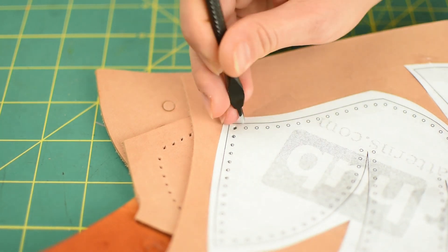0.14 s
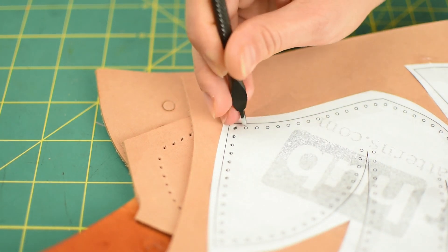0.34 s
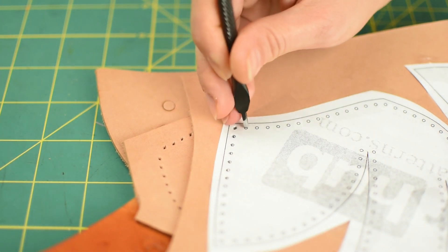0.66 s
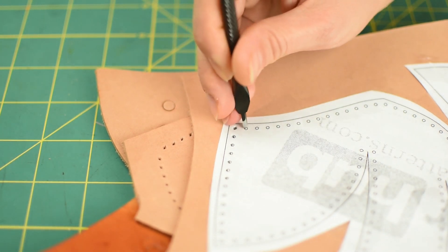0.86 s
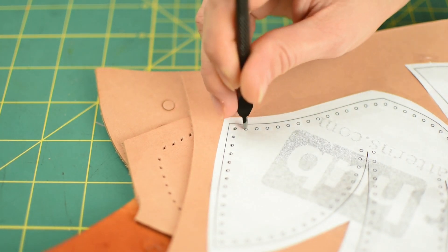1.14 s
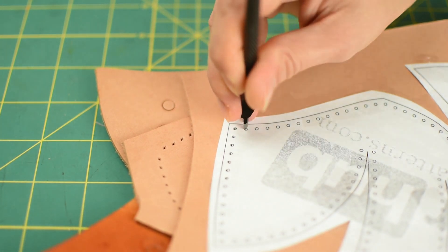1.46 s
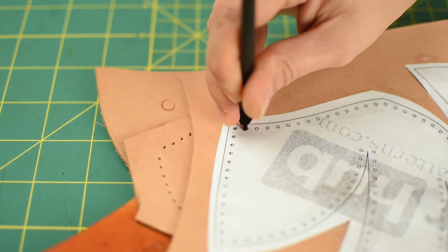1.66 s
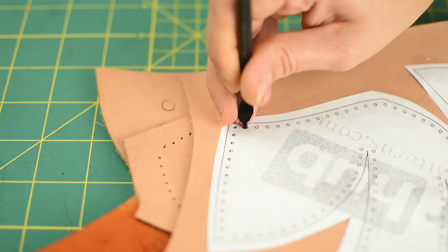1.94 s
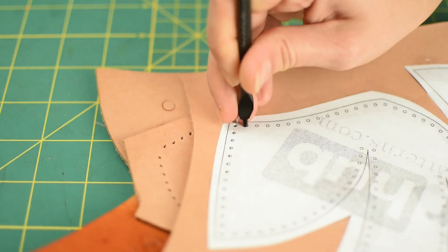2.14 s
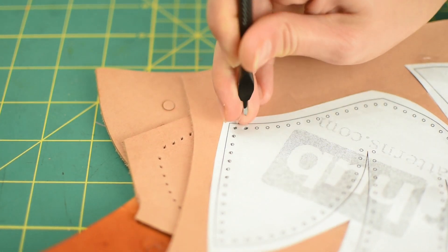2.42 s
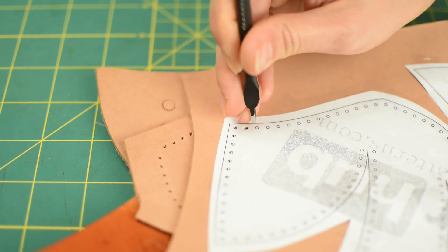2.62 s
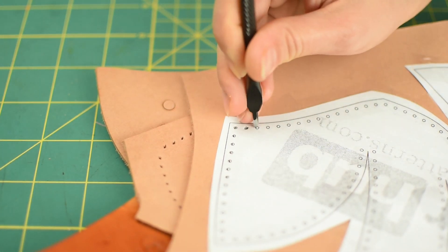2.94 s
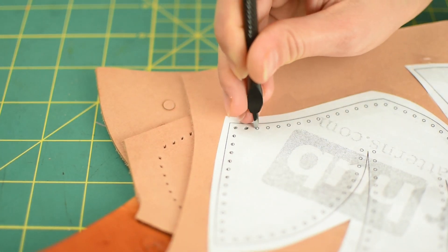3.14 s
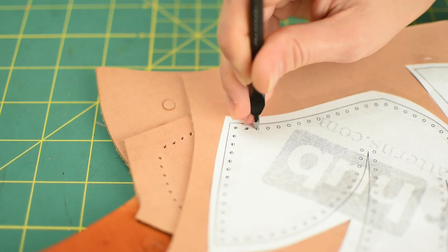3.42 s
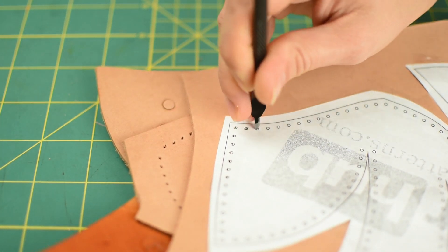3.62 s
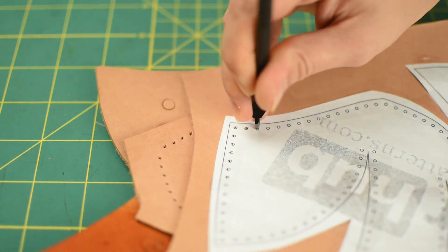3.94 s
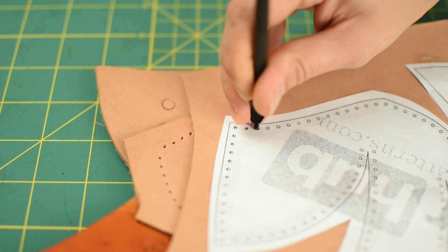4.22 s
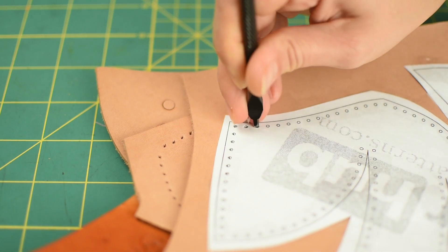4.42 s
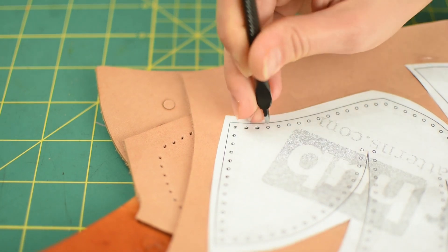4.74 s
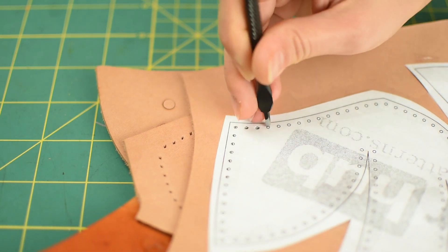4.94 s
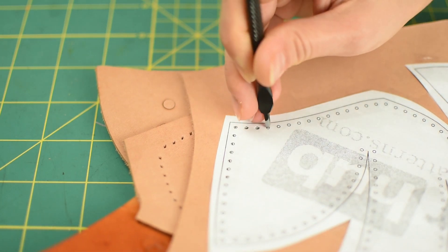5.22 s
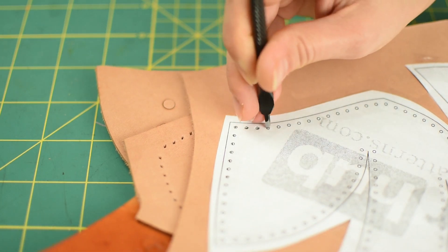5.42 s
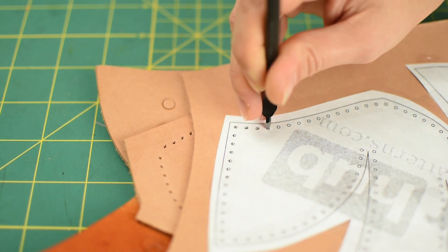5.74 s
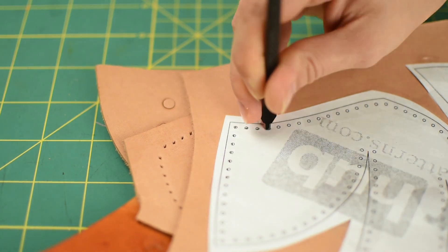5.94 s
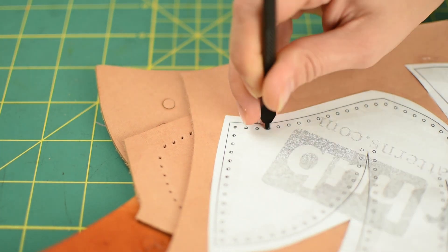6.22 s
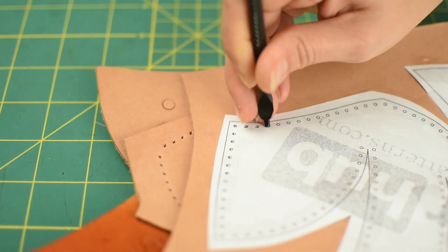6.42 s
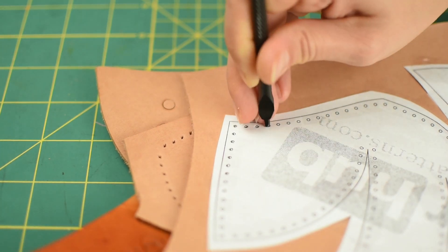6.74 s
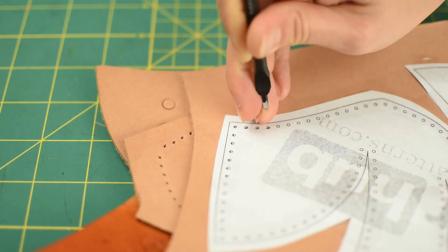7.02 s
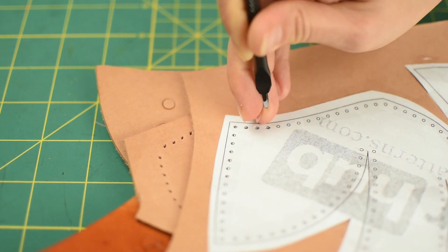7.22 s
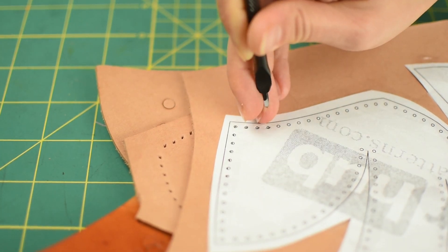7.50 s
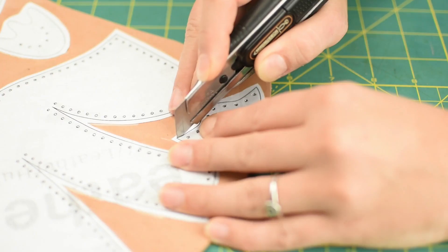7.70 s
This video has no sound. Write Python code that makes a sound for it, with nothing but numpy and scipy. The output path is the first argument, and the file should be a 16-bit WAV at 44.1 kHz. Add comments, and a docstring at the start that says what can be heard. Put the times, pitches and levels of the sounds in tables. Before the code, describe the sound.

A mallet drives a steel punch through leather in three loud blows on a workbench, with faint ticks and small hollow pops between.

```python
"""Punching leather on a workbench

A wooden mallet drives a steel punch through leather three times, exciting the modes of punch and bench
and overloading a close microphone. Between blows the punch slides and ticks on the paper pattern and
pops out of its holes, while a fan hums and a wall clock ticks in the small room. Near the end, after
a short silence, a knife starts to scrape."""
import sys
import numpy as np
from scipy import signal
from scipy.fft import rfft, irfft, next_fast_len
from scipy.io import wavfile
from scipy.ndimage import uniform_filter1d, map_coordinates

SR = 44100
rng = np.random.default_rng(int(sys.argv[2]) if len(sys.argv) > 2 else 0)


def store_wav(level_fs):
    """Save 16-bit WAV to argv[1]."""
    pcm = np.round(np.clip(np.atleast_2d(level_fs), -1, 1) * 32767)
    wavfile.write(sys.argv[1], SR, pcm.T.astype(np.int16))


N = 347057

# Mallet blows. Each row: time in seconds, level in dB, bench gain in dB, crash tilt in dB per octave,
# rattle gain in dB.
BLOWS = [(1.641, 0.5, -4, -0.5, 6), (4.01, -2, -3, 0, 1.5), (5.962, 0.5, -2.5, 0, 5)]
# Reflections from bench, hands and wall. Each row: delay in seconds, gain in dB.
ECHOES = [(.003, -1), (.0056, -2), (.0085, -5.5)]
def blows():
    """Superposition: one impact excites punch, tools and bench; the strike returns as early echoes."""
    out, t = np.zeros((2, N)), np.arange(SR) / SR
    for s, db, bench_db, tilt_db, rattle_db in BLOWS:
        strike = punch_strike(t)
        blow = strike + crash(t, tilt_db) + rattle(t, rattle_db) + bench_top(t, bench_db)
        add(out, amp(db) * blow, s + 0.00027)
        for delay, echo_db in ECHOES:
            add(out, amp(db + echo_db) * strike[None], s + delay)
    return out


# Modes of the struck punch. Each row: frequency in Hz, level in dB, T60 (time to fall 60 dB) in seconds.
PUNCH_MODES = [(1302, -2.5, 0.037), (1750, -5, 0.014), (2124, -8.5, 0.044), (2893, -3, 0.045),
               (3250, -3.5, 0.023)]
def punch_strike(t):
    """Impulsive excitation: a pressure front pushes and rebounds, then the steel rings."""
    u = t / .00009
    front = 3.5 * u ** 2 * (1 - .3 * u) * np.exp(-u)
    return front + amp(-5) * ring(PUNCH_MODES, t, scatter_db=1.4, attack_s=0.0025)


# Spectrum of all that shakes in a blow. Each row: frequency in Hz, relative level in dB.
CRASH_SPECTRUM = [(90, -31.5), (140, -12), (320, -10), (545, -10.5), (800, -6), (950, -9.5), (1300, -7.5),
                  (2000, -9.5), (3200, -15), (4500, -22), (7000, -29.5), (9300, -34), (12000, -43),
                  (15900, -54.5)]
# Its decay. Each row: frequency in Hz, T60 in seconds.
CRASH_T60 = [(150, 0.84), (500, .33), (1500, 0.32), (4000, 0.33), (10000, 0.21), (16000, 0.16)]
def crash(t, tilt_db):
    """Modal overlap: the many resonances of tools and walls merge into decaying noise."""
    colour_db = lambda hz: along(CRASH_SPECTRUM, hz) + tilt_db * np.log2(hz / 1500)
    noise = decaying_noise(CRASH_T60, colour_db, seconds=1)[:, :SR]
    near_clatter = 1 + amp(-3.5 - 60 * t / 0.017)  # dies first
    grain = amp(2.5 * wobble(160, count=SR) * rise(t, 0.036))
    return amp(20.5) * noise * rise(t, 0.0003) ** 2 * near_clatter * grain


# Resonances of loose tools. Each row: frequency in Hz, bandwidth in Hz, gain in dB.
TOOL_BANDS = [(4840, 1100, 3.5), (9200, 2200, 1.5), (13500, 6100, -7)]
def rattle(t, db):
    """Secondary impacts: jolted tools land in clumps, heard as uneven bright noise."""
    landings = rng.standard_normal((2, SR)) * amp(1.4 * wobble(110, count=SR) - 60 * t / .22)
    bright = filtered(landings * rise(t, 0.013), lambda hz: resonances(TOOL_BANDS)(hz) ** 2)
    return amp(db - 25.5) * stereo(bright, NEAR_COHERENCE)


# Modes of the bench top, and its lowest pair. Each row: frequency in Hz, level in dB, T60 in seconds.
BENCH_MODES = [(136, -7, 0.083), (162, -3.5, 0.092), (288, -4.5, 0.067), (169, -17, 0.36), (211.2, -16, .5),
               (255.7, -8.5, 0.37), (278, -3, 0.2), (297.7, -11.5, 0.43), (335.5, -5.5, 0.29),
               (436, -18, 0.13), (433, -16, 0.24), (503, -17.5, .35), (633, -15, 0.42), (801, -14, 0.33),
               (956, -18.5, 0.42), (1099, -17, .3)]
BOOM_MODES = [(92.5, -9, .24), (99.5, -9, .24)]
def bench_top(t, db):
    """Plate vibration: the wood rings while its two lowest modes swell in and beat."""
    first_swings = 1 + amp(-3.5 - 60 * t / 0.029)  # soon damped by the hand
    wood = amp(db - 5) * ring(BENCH_MODES, t, scatter_db=0.89, attack_s=0.0023) * first_swings
    return wood + amp(db - 1) * ring(BOOM_MODES, t, scatter_db=0.79, attack_s=0.02)


# Modes of the bench on its legs. Each row: frequency in Hz, level in dB, T60 in seconds.
LEG_MODES = [(30, -52, 1), (34.2, -51.5, 1)]
def bench_sway():
    """Beating: two slow modes of nearly equal frequency interfere after each blow."""
    out, t = np.zeros(N), np.arange(SR) / SR
    for s, db, *_ in BLOWS:
        add(out, amp(db) * ring(LEG_MODES, t, scatter_db=0.94, attack_s=0.0065), s)
    return out


# The punch taps, bounces or pops free. Each row: time in seconds, level in dB, pop pitch in Hz,
# crack gain in dB, thud gain in dB, damping factor (1 is free).
KNOCKS = [(0.0651, -45, 1190, -6.5, -22, 1.5), (1.0004, -41.5, 1180, -9, -20, 0.59),
          (1.1178, -38.5, 1280, 0, -25, 0.48), (1.1652, -48, 1210, -6, -12.5, 1),
          (1.4004, -47.5, 1200, 2, -4.5, 1), (2.408, -14, 1530, -5, -10.5, 0.57),
          (3.5503, -38, 1500, 1, -16.5, 1), (3.5893, -45, 1150, -12, -11, 1.5),
          (3.6761, -41, 1502, 2.5, -16, 1), (3.9578, -46.5, 1944, -4.5, 6, 1.5),
          (4.0983, -15.5, 1870, -14.5, -3.5, 0.37), (4.124, -20, 2070, -8, -1, 1),
          (4.2019, -28, 1300, -10, 6, 0.3), (4.2566, -42.5, 1160, -12, -8, 1.3),
          (4.379, -40, 1140, -15, -3.5, 0.55), (4.5017, -18, 1142, 1.5, -6.5, 0.43),
          (6.942, -17, 1565, -9.5, -7, .7), (7.5865, -24, 1123, -6.5, -6.5, 0.88)]
# Modes of the hollow punch. Each row: frequency in Hz, level in dB, T60 in seconds.
TUBE_MODES = [(830, -6, .03), (1125, 0, .025), (1175, -3, .035), (1280, -4, .025), (1510, -2, .025),
              (1640, 0, .02), (1870, -3, .025), (2100, -4, .025), (2870, -4, .02), (3700, -3, .02)]
def punch_knocks():
    """Resonance: a hollow pop excites the tube modes near its pitch, with a crack and a bench thud."""
    out, t = np.zeros(N), np.arange(SR // 4) / SR
    for s, db, pop_hz, crack_db, thud_db, damping in KNOCKS:
        pop = (t / 0.0008) ** 1.2 * np.exp(-t / 0.001) * np.sin(2 * np.pi * pop_hz * t)
        snap = (amp(-60 * t / 0.024) + amp(-21 - 60 * t / 0.043)) * rise(t, 0.00017)
        cutoff_hz = 30000 * amp(.45 * db)  # softer knocks are duller
        crack = filtered(snap * rng.standard_normal(len(t)),
                         lambda hz: band(2500, 5000)(hz) ** 2 / (1 + 1j * hz / cutoff_hz))
        thud = ring(BOOM_MODES + BENCH_MODES, t, scatter_db=2, attack_s=0.013)
        thud *= amp(thud_db - 60 * t / 0.14)  # damped by the resting hand
        slip = filtered(rng.standard_normal(400), lambda hz: band(pop_hz, 2500)(hz) ** 3)
        slip *= amp(db - 19.5 + 60 * (t[:400] - t[400]) / 0.041)
        add(out, slip, s - t[400])  # the leather slips just before it lets go
        modes = [(hz, level - 7 * np.log2(hz / pop_hz) ** 2, t60 / damping)
                 for hz, level, t60 in TUBE_MODES]
        tube = ring(modes, t, scatter_db=2, attack_s=.0015)
        add(out, amp(db - 7) * (amp(7.5) * pop + amp(-7) * tube + amp(crack_db) * crack + thud), s)
    return out


# The punch shifts in the fingers. Each row: time in seconds, level in dB, tilt in dB per octave.
TICKS = [(0.1107, -47, 1), (0.207, -43, -1), (0.2536, -46.5, -3), (0.305, -43.5, -7), (0.614, -40, -2),
         (2.3354, -43.5, -9), (2.8421, -40.5, -6), (6.303, -44.5, -6)]
# Modes of the free shaft. Each row: frequency in Hz, level in dB, T60 in seconds.
SHAFT_MODES = [(2320, 0.5, 0.045), (3840, 7.5, 0.036), (4530, 5, 0.02), (5460, 1, 0.081), (6040, 0, 0.043)]
def shaft_ticks(grip_damping=3):
    """Damped vibration: the fingers absorb energy, so the steel shaft rings only briefly."""
    out, t = np.zeros(N), np.arange(SR // 10) / SR
    middle_lift_db = lambda hz: 2 * np.exp(-(np.log2(hz / 4000) / .3) ** 2)
    for s, db, tilt_db in TICKS:
        modes = [(hz, level + tilt_db * np.log2(hz / 3800) + middle_lift_db(hz), t60 / grip_damping)
                 for hz, level, t60 in SHAFT_MODES]
        burst = amp(8.5 - 60 * t / 0.012) * rng.standard_normal(len(t))
        snap = filtered(burst, lambda hz: band(4300, 3200)(hz) ** 3)
        add(out, amp(db - 11.5) * (ring(modes, t, scatter_db=2.8, attack_s=0.00074) + snap), s)
    return out


# Touches of punch tip, paper and mallet face. Each row: time in seconds, level in dB, centre in Hz,
# upper band gain in dB, hiss T60 in seconds.
CLICKS = [(0.0423, -52, 2340, -10, .045), (0.0578, -43, 2750, -20, 0.1), (0.398, -42, 2270, -8.5, 0.18),
          (0.7248, -47, 3300, -16, .12), (1.0105, -48, 2010, -15, .045), (1.0494, -52, 2530, -9, .045),
          (1.3433, -41.5, 2364, -8, .06), (1.8517, -46, 2290, 0, .03), (1.9714, -52, 2740, -26, .045),
          (2.0223, -58, 2200, -18, .045), (2.0544, -56, 2120, -16, 0.049), (2.1051, -52, 3890, -6, .03),
          (2.1266, -34.5, 3490, 21.5, 0.18), (2.1394, -36.5, 2270, -7, 0.111),
          (2.1924, -47, 1880, -18, .04), (2.6135, -47, 2290, -8, .06), (3.8127, -43, 2403, -8, 0.022),
          (4.9432, -35.5, 2800, 0, 0.085), (5.6835, -41.5, 2412, -23, 0.055), (5.9, -32.5, 2365, -14, .045),
          (5.9069, -41.5, 2990, -15.5, .045), (5.9114, -39.5, 2310, -15.5, .045),
          (5.9180, -29, 2490, -8.5, .03), (5.9229, -25, 4105, -10, .04), (5.9344, -39, 3000, 16.5, 0.028),
          (6.2140, -51, 4000, 16, .03), (6.2721, -37.5, 2030, -5.5, .063),
          (6.3435, -36, 2570, -12.5, 0.058), (6.3594, -40, 2518, -21, 0.13),
          (6.4208, -43.5, 2480, -12, .045), (6.536, -43.5, 2700, -15, .05)]
def contact_clicks():
    """Brief contact has a broad spectrum: a tick in two wide bands, with a papery after-hiss."""
    out, t = np.zeros(N), np.arange(SR // 6) / SR
    paper_lowpass = lambda f: 1 / (1 + 1j * f / 9000) ** 2
    for s, db, hz, upper_db, t60 in CLICKS:
        burst = rng.standard_normal(len(t)) * (amp(-60 * t / 0.013) + amp(-7.5 - 60 * t / t60))
        lower, upper = band(hz, 0.99 * hz), band(5300, 9000)
        tick = filtered(burst, lambda f: (lower(f) ** 3 - amp(upper_db) * upper(f) ** 3) * paper_lowpass(f))
        add(out, amp(db) * tick / np.abs(tick).max(), s)
    return out


# Loose things rock after a blow, and paper shifts. Each row: start and length in seconds, level in dB,
# drift in dB per second.
ROCKING = [(1.85, 0.49, -47.5, -20.5), (4.22, .15, -57, -150), (6.15, 0.66, -47, -70)]
PAPER_SHIFTS = [(1.9, 0.31, -56.5, -5), (4.43, 0.027, -69, 0), (5.41, 0.053, -60, 0), (6.23, .4, -65, -4.5),
                (7.05, 0.046, -64.5, -64), (7.31, 0.071, -58, -65)]
# Resonances of the rocking things. Each row: frequency in Hz, bandwidth in Hz, gain in dB.
ROCKING_BANDS = [(159.4, 62, -4), (213.4, 74, -1), (276, 43, -1.5), (481, 130, -8.5)]
# Rustle of the paper. Each row: frequency in Hz, relative level in dB.
PAPER_SPECTRUM = [(290, -48), (500, -6), (796, -4), (1030, -12), (1140, -9), (2740, -16.5), (12000, -46.5),
                  (15600, -64), (22000, -120)]
def tools_and_paper(contacts_per_s=40, depth_db=5):
    """Amplitude modulation: repeated contacts pulse the hum of rocking tools and the rustle of paper."""
    hum = friction(lambda hz: resonances(ROCKING_BANDS)(hz) ** 2, rate=25, rough_db=1.5)
    contacts = np.cumsum(contacts_per_s * (1 + .25 * wobble(12))) / SR
    bumps = amp(depth_db * np.cos(2 * np.pi * contacts))
    rustle = friction(lambda hz: amp(along(PAPER_SPECTRUM, hz)), rate=87, rough_db=3.5)
    return (strokes(ROCKING, attack_s=.01, release_s=0.23) * unit(bumps * hum)
            + strokes(PAPER_SHIFTS, attack_s=0.047, release_s=.1) * unit(bumps * rustle))


# The punch slides over the work. Each row: start and length in seconds, level in dB.
SLIDES = [(0.973, 0.12, -62), (1.64, .025, -57), (3.454, 0.16, -67), (3.934, .04, -57.5),
          (4.341, 0.043, -61)]
# Resonances of the sliding tube. Each row: frequency in Hz, bandwidth in Hz, gain in dB.
RASP_BANDS = [(1110, 78, -1.5), (1270, 140, -4.5), (1650, 200, -11.5), (2940, 400, -18)]
def punch_slides(swell_db_per_s=44):
    """Sliding friction drives the tube's resonances, louder as each stroke goes on."""
    gain = strokes([(*row, swell_db_per_s) for row in SLIDES], attack_s=0.16, release_s=.03)
    return gain * scrape(RASP_BANDS, rate=100, rough_db=2.5)


# One twist of the punch: start and length in seconds, level in dB, drift in dB per second.
TWIST = (6.38, .29, -61, -3)
# Resonances of its creak. Each row: frequency in Hz, bandwidth in Hz, gain in dB.
CREAK_BANDS = [(1590, 140, -4), (2186, 14, -1), (2475, 60, -3.5)]
def punch_twist():
    """Uneven friction: the punch creaks as it turns in the leather."""
    return strokes([TWIST], attack_s=0.025, release_s=0.051) * scrape(CREAK_BANDS, rate=18, rough_db=6)


# Knife strokes. Each row: start and length in seconds, level in dB.
CUTS = [(7.667, 0.066, -57.5), (7.774, 0.015, -58.5), (7.796, 0.065, -69.5)]
# Resonances of the blade. Each row: frequency in Hz, bandwidth in Hz, gain in dB.
BLADE_BANDS = [(1710, 60, 2), (2174, 234, -2), (2810, 30, -10), (3545, 32, -12)]
def knife():
    """Forced vibration: scraping drives the blade and a low resonance of the mat under it."""
    cuts = [(*row, 0) for row in CUTS]
    blade = scrape(BLADE_BANDS, rate=200, rough_db=5.5)
    mat = amp(-5.5) * friction(band(400, 180), rate=60, rough_db=1.1)
    return (strokes(cuts, attack_s=0.018, release_s=0.028) * blade
            + strokes(cuts, attack_s=.05, release_s=0.14) * mat)


# Resonances of the clock case. Each row: frequency in Hz, bandwidth in Hz, gain in dB.
CASE_BANDS = [(860.3, 27, -7), (1460, 32, 3), (2000, 29, -10), (2700, 65, -1), (3000, 59, -7.5),
              (4630, 63, -5), (5500, 290, -5)]
def clock():
    """Case resonance: once a second a stepping motor whirrs briefly, heard mostly off the walls."""
    second, t = np.divmod(np.arange(N) / SR - .41, 1)
    step = rise(t, 0.0188) ** 2 * amp(-60 * t / .2)
    noise = rng.standard_normal((2, N))
    case = lambda hz: resonances(CASE_BANDS[:-1])(hz) + amp(-12.5) * band(1800, 4000)(hz)
    body = filtered(noise, lambda hz: case(hz) / (1 + (hz / 7000) ** 4))
    top = filtered(noise, lambda hz: resonances(CASE_BANDS[-1:])(hz) ** 2)
    top *= amp(1.5 - 7 * (second % 2 == 0))  # every other tick is duller
    return amp(-44) * step * stereo(unit(body + top), FAR_COHERENCE)


# Decay of the room. Each row: frequency in Hz, T60 in seconds.
ROOM_T60 = [(150, 0.89), (1000, 0.15), (4000, 0.2), (12000, 0.28)]
def room(x):
    """Reverberation by convolution: the response changes every half second, as hands and tools move."""
    out, hop = np.zeros((2, N)), SR // 2
    for start in range(0, N, hop):
        tail = decaying_noise(ROOM_T60, np.zeros_like, seconds=.45)
        add(out, signal.fftconvolve(x[None, start:start + hop], tail, axes=1), start / SR + 0.005)
    return out


# Faint coloured hiss. Each row: start and length in seconds, level in dB, centre in Hz.
WHISTLES = [(.36, .25, -75, 2780), (2.7, .3, -77, 2780), (7.04, .3, -78, 4230)]
def whistles():
    """Narrow-band noise has a faint pitch; it comes and goes barely over the room tone."""
    responses = lambda f: np.array([band(hz, 220)(f) ** 2 for *_, hz in WHISTLES])
    noises = friction(responses, rate=40, rough_db=4)
    return sum(strokes([(s, length, db, 0)], attack_s=0.13, release_s=0.17) * noise
               for (s, length, db, _), noise in zip(WHISTLES, noises))


# Colour of the room tone. Each row: frequency in Hz, relative level in dB.
AIR_SPECTRUM = [(20, -13), (45, -12), (75, -14.5), (105, -8.5), (145, -4.5), (215, -7), (269, -4.5),
                (336, -7), (430, -7.5), (676, -4.5), (900, -7.5), (1250, -11.5), (2300, -15.5),
                (4000, -20.5), (7000, -28.5), (10000, -32.5), (13000, -37.5), (16000, -40.5)]
# Its course. Each row: time in seconds, level in dB.
AIR_LEVELS = [(0, -60.5), (1.5, -62), (2.6, -59), (3.3, -61), (4.7, -61.5), (5.3, -62), (5.5, -58),
              (5.9, -61), (6.8, -61), (7.6, -59), (7.87, -61)]
def room_tone():
    """Ambient noise: a broad spectrum whose level varies in soft patches of time and frequency."""
    spectra = signal.stft(rng.standard_normal((2, N)), nperseg=512)[2]
    patches = uniform_filter1d(rng.standard_normal(spectra.shape[1:]), size=6, axis=0)
    patches = uniform_filter1d(patches, size=14, axis=1)
    noise = signal.istft(spectra * amp(1.1 * unit(patches)), nperseg=512)[1][:, :N]
    tone = unit(stereo(filtered(noise, lambda hz: amp(along(AIR_SPECTRUM, hz))), FAR_COHERENCE))
    return amp(np.interp(np.arange(N) / SR, *np.transpose(AIR_LEVELS))) * tone


# Blade tones of the fan. Each row: frequency in Hz, level in dB.
FAN_TONES = [(140.0, -73.5), (279.9, -76), (414.5, -78.5), (554.5, -84), (672.9, -73.5)]
def fan():
    """Rotating blades radiate tones, unsteady in amplitude and phase."""
    t = np.arange(N) / SR
    return sum(amp(db + 2 + 3 * wobble(12)) * np.sin(2 * np.pi * hz * t + 2.2 * wobble(14))
               for hz, db in FAN_TONES)


def microphone_hiss():
    """Self-noise: the microphone ports add a steady high hiss."""
    return amp(-85) * filtered(rng.standard_normal((2, N)), lambda hz: hz / (hz + 6000))


# Likeness of left and right, for near and for far sound. Each row: frequency in Hz, correlation.
NEAR_COHERENCE = [(100, .998), (1000, .992), (2500, .95), (5000, .87), (10000, .65), (16000, .4)]
FAR_COHERENCE = [(60, 0.56), (180, 0.61), (550, 0.83), (1650, 0.53), (4970, 0.35), (15000, -0.82)]
def stereo(pair, coherence):
    """Mid-side mixing gives two independent signals a set correlation."""
    angle = lambda hz: np.arccos(np.clip(along(coherence, hz), -1, 1)) / 2
    mid, side = filtered(pair, lambda hz: np.array([np.cos(angle(hz)), np.sin(angle(hz))]))
    return np.array([mid + side, mid - side])


def decaying_noise(t60s, colour_db, seconds):
    """Frequency-dependent damping of stereo noise, scaled to unit energy on the left."""
    hz, t, spectra = signal.stft(rng.standard_normal((2, int(seconds * SR))), SR, nperseg=128)
    gain = amp(colour_db(hz + 20)[:, None] - 60 * t / along(t60s, hz)[:, None])
    tail = stereo(signal.istft(spectra * gain, SR, nperseg=128)[1], NEAR_COHERENCE)
    return tail / np.linalg.norm(tail[0])


def ring(modes, t, scatter_db, attack_s):
    """Free vibration: a sum of damped sinusoids, at slightly new strengths each time."""
    return rise(t, attack_s) * sum(
        amp(db + rng.normal(0, scatter_db) - 60 * t / t60) * np.sin(2 * np.pi * hz * t)
        for hz, db, t60 in modes)


def friction(response, rate, rough_db):
    """Source and filter: uneven noise through a body's response, at unit rms."""
    return unit(filtered(rng.standard_normal(N) * amp(rough_db * wobble(rate)), response))


def scrape(bands, rate, rough_db):
    """Friction noise through resonances, rolled off above 6 kHz."""
    return friction(lambda hz: resonances(bands)(hz) / (1 + (hz / 6000) ** 2), rate, rough_db)


def strokes(rows, attack_s, release_s):
    """Envelope of (start, length, dB, drift) gestures; attack and release each span 30 dB."""
    t = np.arange(N) / SR
    return sum(amp(db + drift * np.clip(t - s, 0, length) - 30 * np.maximum(s - t, 0) / attack_s
                   - 30 * np.maximum(t - s - length, 0) / release_s) for s, length, db, drift in rows)


def resonances(bands):
    """Response of parallel second-order resonators of alternating sign."""
    return lambda f: sum((-1) ** k * amp(db) * 1j * f * width / (hz * hz - f * f + 1j * f * width)
                         for k, (hz, width, db) in enumerate(bands))


def band(hz, width_hz):
    return resonances([(hz, width_hz, 0)])


def filtered(x, response):
    """Linear filtering: the spectrum of x times a frequency response."""
    n = x.shape[-1]
    padded = next_fast_len(n + 8192)
    return irfft(rfft(x, padded) * response(np.fft.rfftfreq(padded, 1 / SR)), padded)[..., :n]


def along(points, hz):
    """Interpolates (Hz, value) points on a log axis."""
    freqs, values = np.transpose(points)
    return np.interp(np.log(hz + 1), np.log(freqs + 1), values)


def wobble(rate, count=N):
    """A smooth random curve with rate knots a second."""
    knots = rng.standard_normal(int(count * rate / SR) + 4)
    return map_coordinates(knots, [np.arange(count) * rate / SR])


def rise(t, time_constant):
    return 1 - np.exp(-t / time_constant)


def amp(db):
    return 10 ** (np.asarray(db) / 20)


def unit(x):
    return x / np.sqrt(np.mean(x ** 2) + 1e-20)


def add(track, sound, s):
    """Mixes a sound in at s seconds."""
    part = track[..., round(s * SR):][..., :sound.shape[-1]]
    part += sound[..., :part.shape[-1]]


def scene():
    """Superposition of bench work and background, the left channel slightly louder than the right."""
    handling = (punch_knocks() + shaft_ticks() + contact_clicks() + tools_and_paper()
                + punch_slides() + punch_twist() + knife() + whistles())
    work = handling + amp(-12.5) * room(handling) + blows()
    low_cut = lambda hz: (band(90, 85)(hz) * 1j * hz / 85) ** 3  # the microphone cuts the work's deep bass
    mix = filtered(work, low_cut) + bench_sway() + clock() + room_tone() + fan() + microphone_hiss()
    return mix * amp([[.35], [-.35]])


def record(dry, top_hz=16050):
    """Saturation and band limiting: the sound drops out briefly, clips at full scale and is low-passed."""
    t = np.arange(N) / SR
    silence_from_s, silence_to_s = 7.644, 7.658
    gated = dry * np.clip(np.maximum(silence_from_s - t, t - silence_to_s) / 0.0025, amp(-48), 1)
    clipped = gated / (1 + np.abs(gated) ** 12) ** (1 / 12)
    return filtered(clipped, lambda hz: hz < top_hz)


dry = scene()
out = record(dry)
store_wav(out)
```